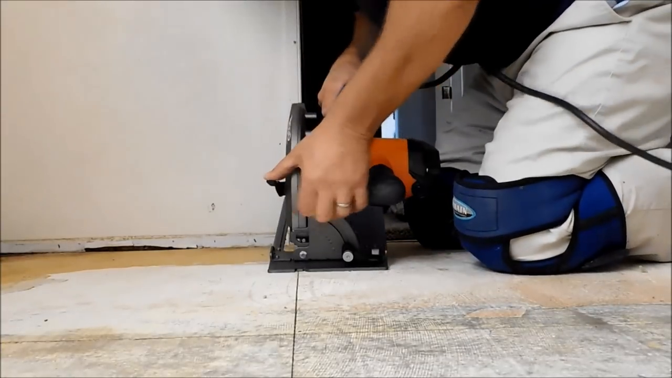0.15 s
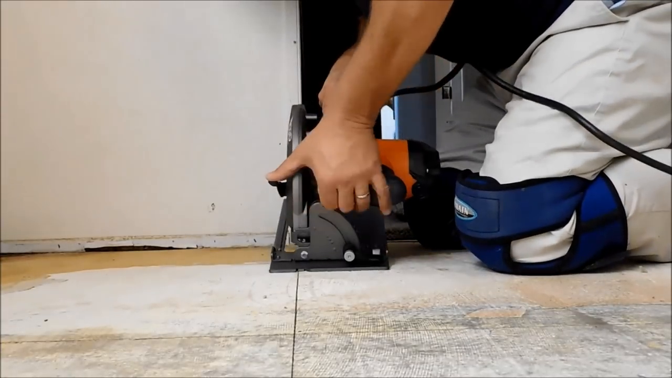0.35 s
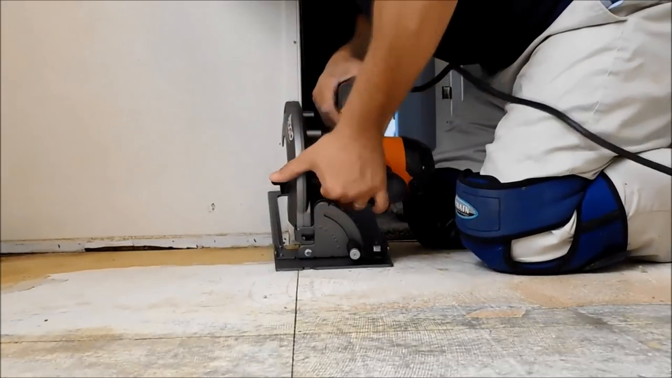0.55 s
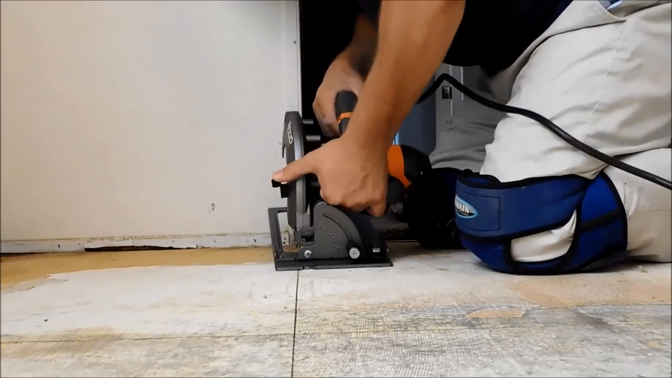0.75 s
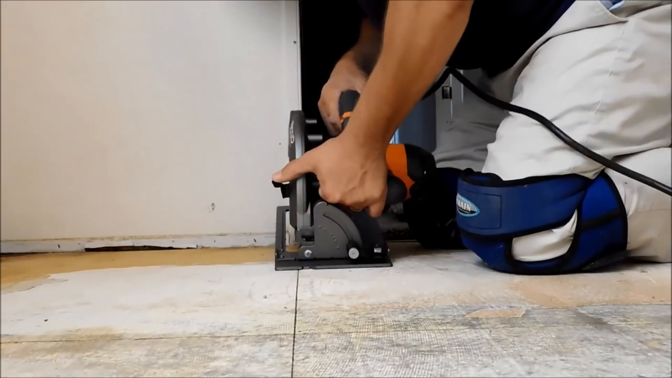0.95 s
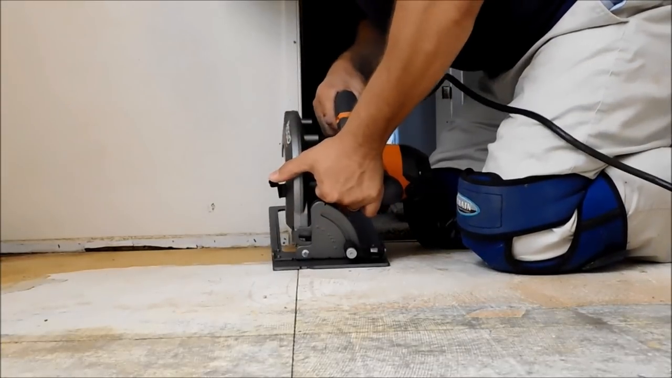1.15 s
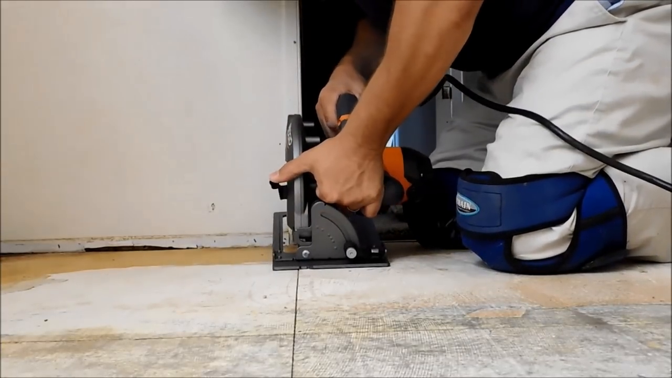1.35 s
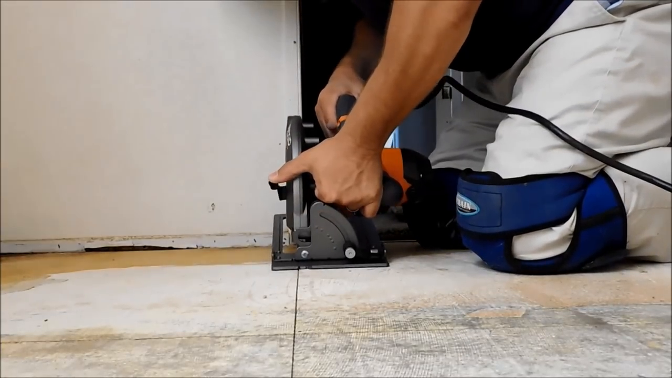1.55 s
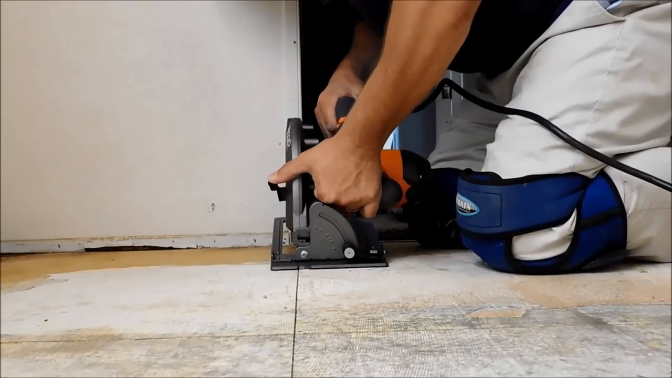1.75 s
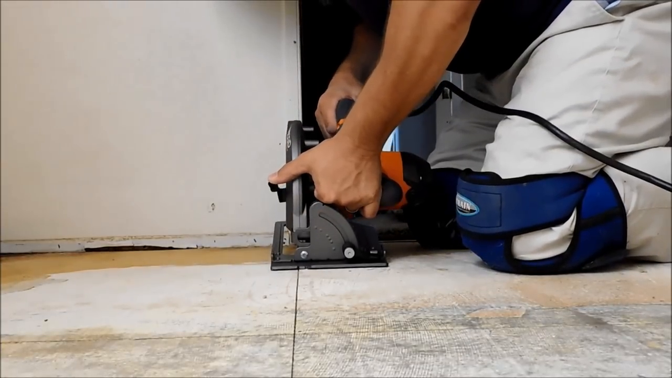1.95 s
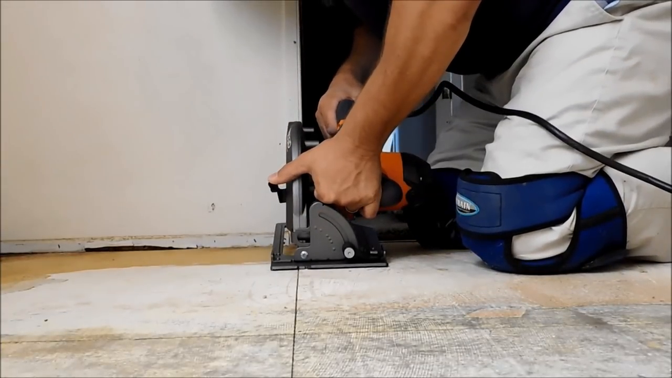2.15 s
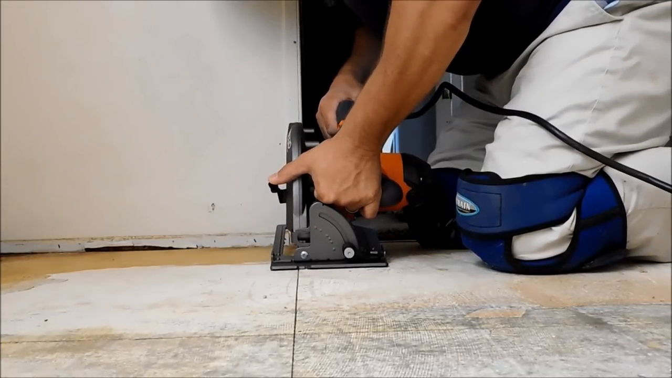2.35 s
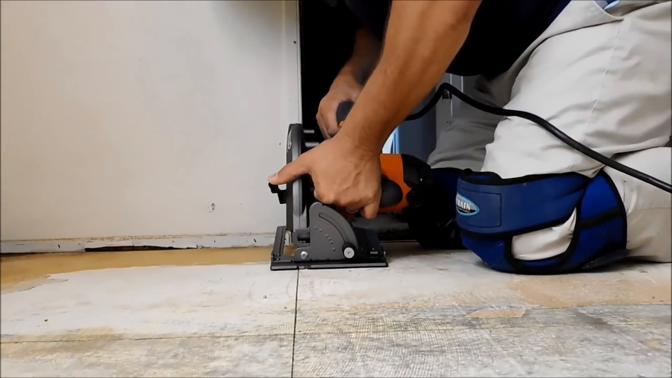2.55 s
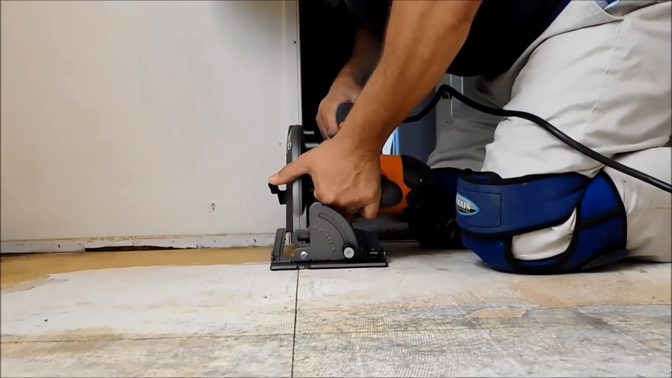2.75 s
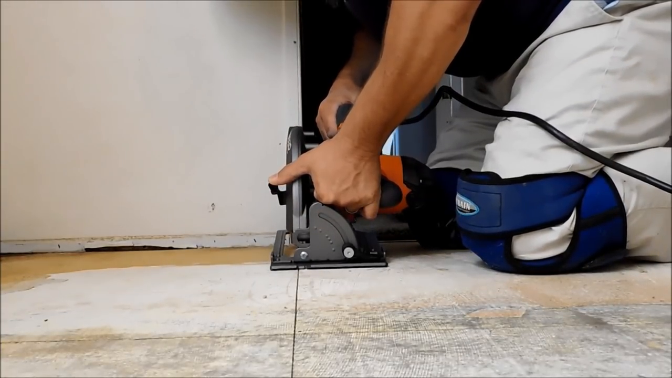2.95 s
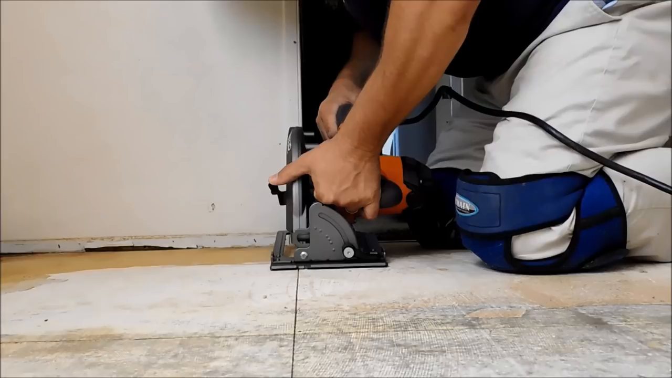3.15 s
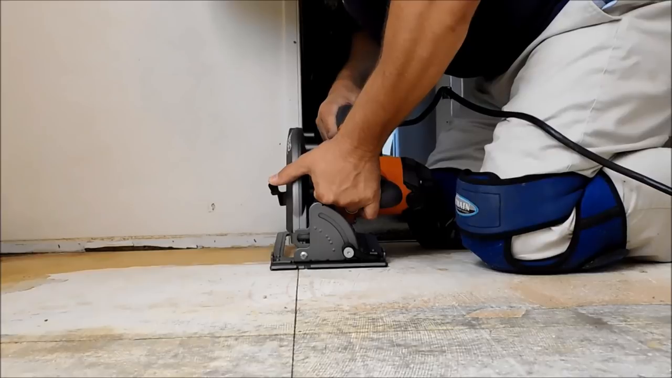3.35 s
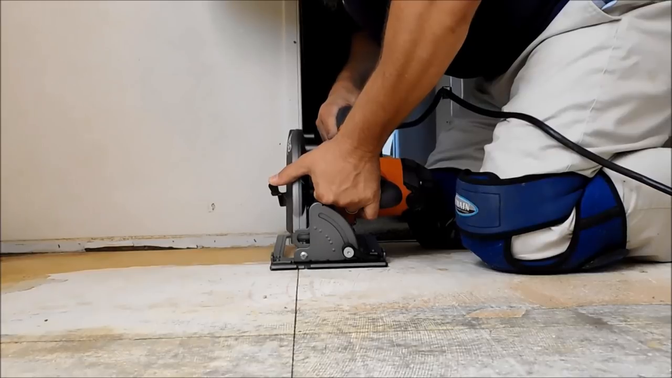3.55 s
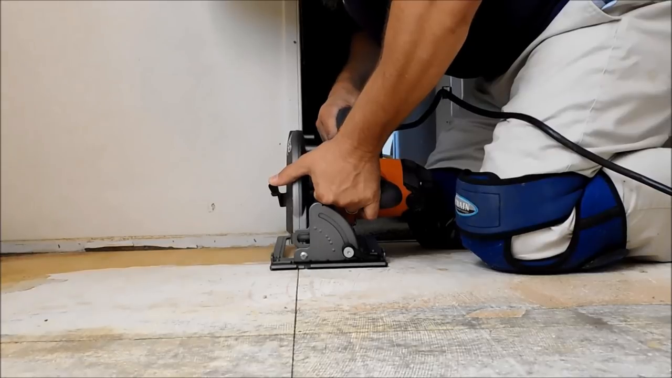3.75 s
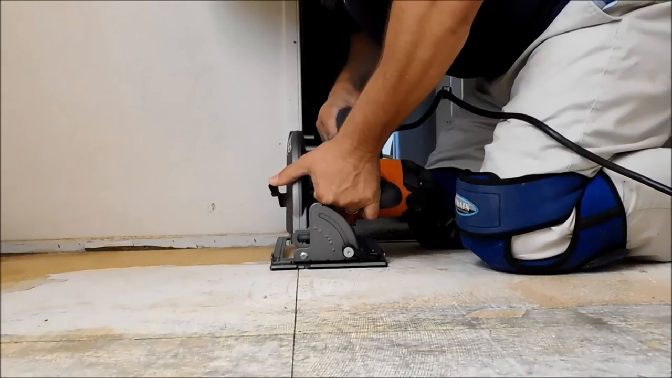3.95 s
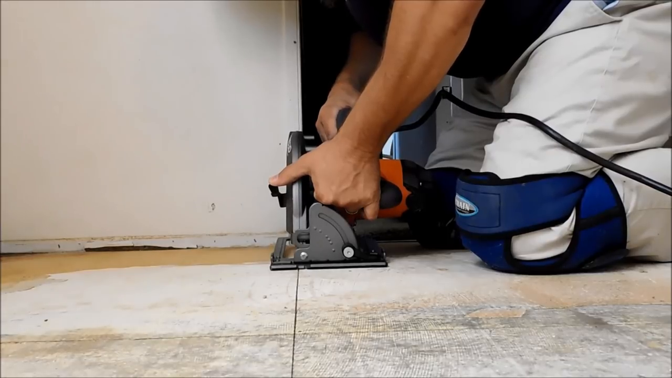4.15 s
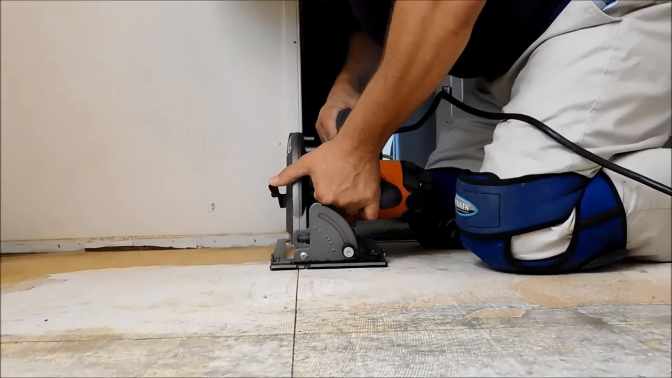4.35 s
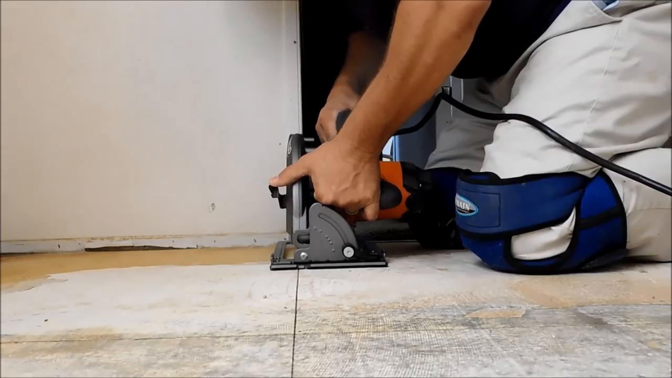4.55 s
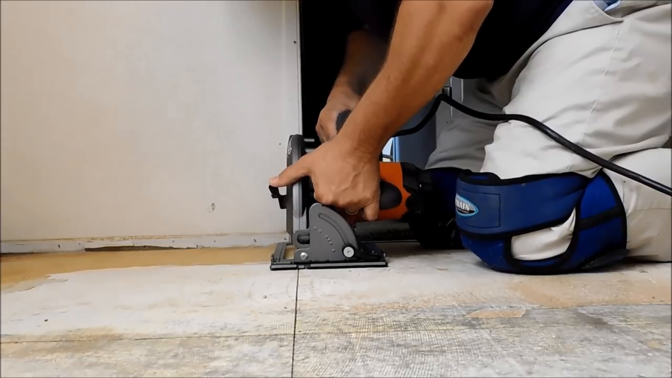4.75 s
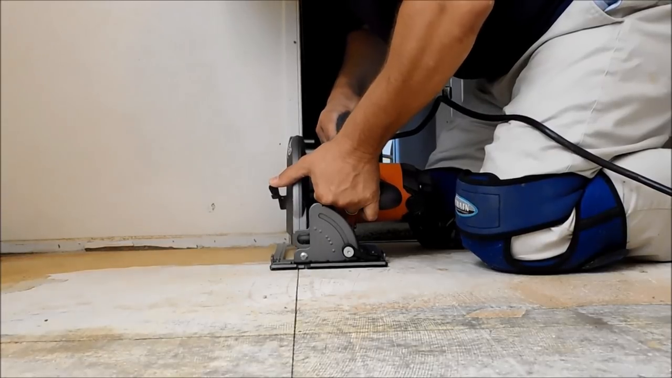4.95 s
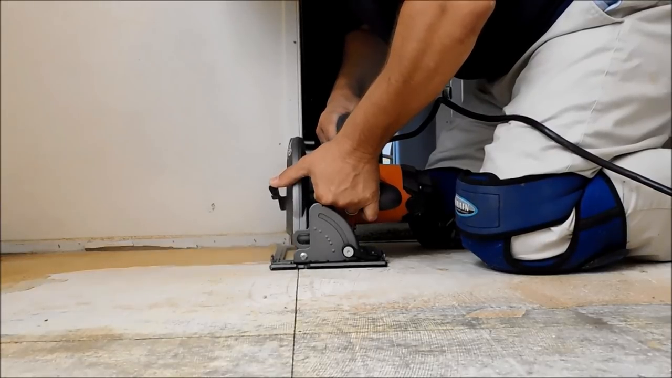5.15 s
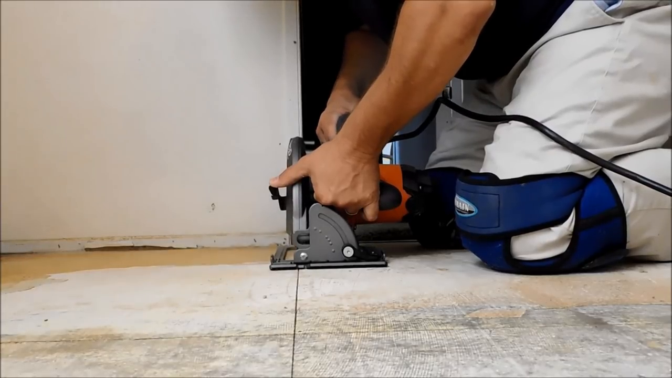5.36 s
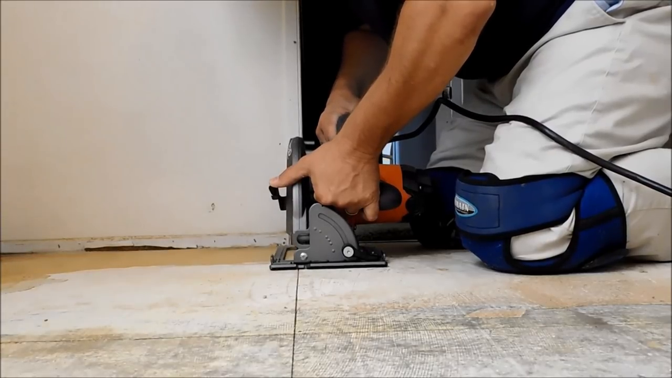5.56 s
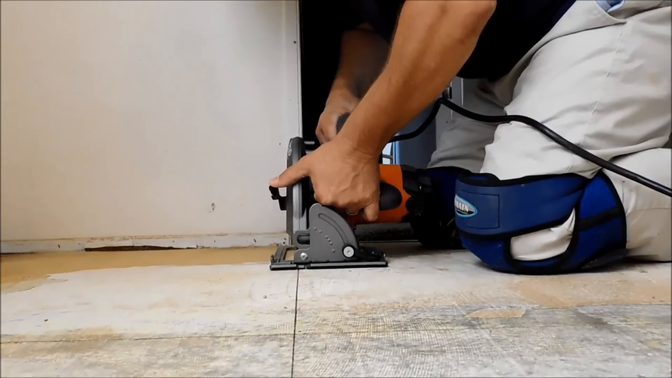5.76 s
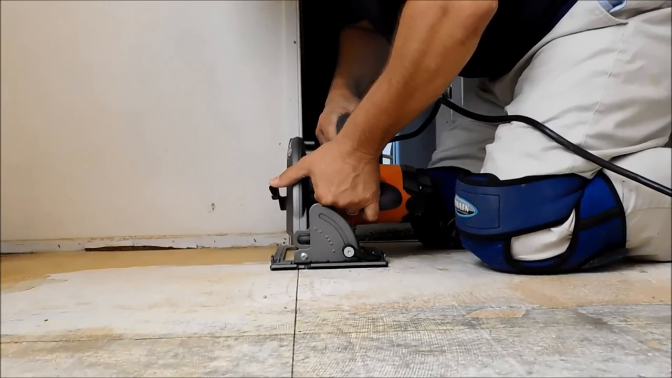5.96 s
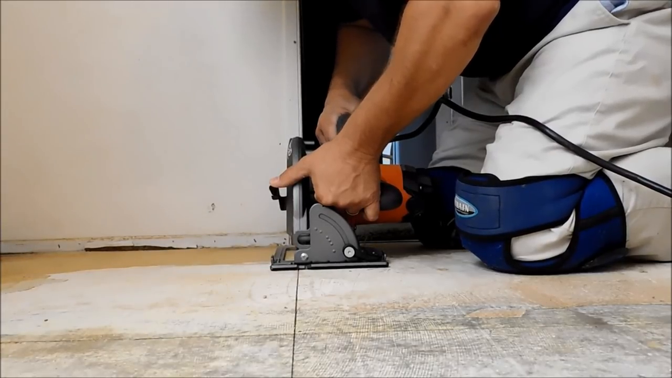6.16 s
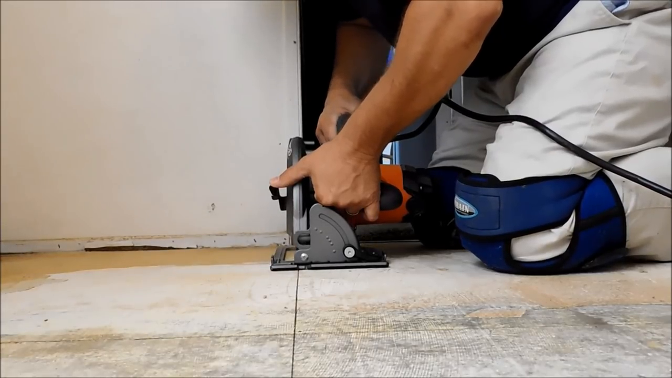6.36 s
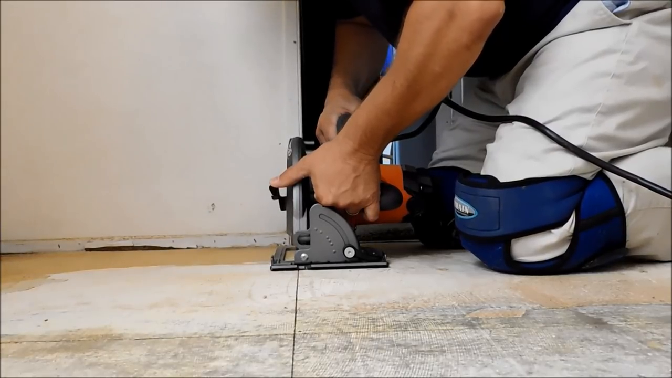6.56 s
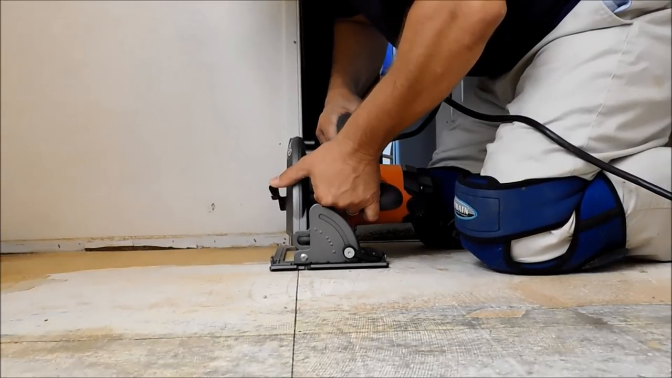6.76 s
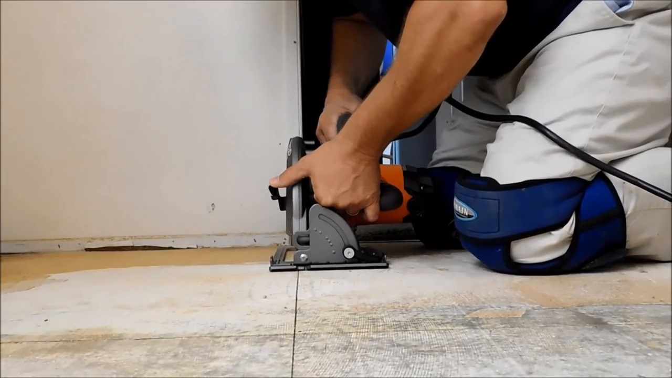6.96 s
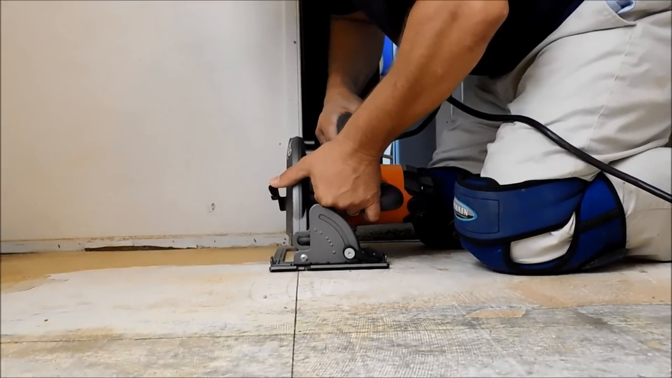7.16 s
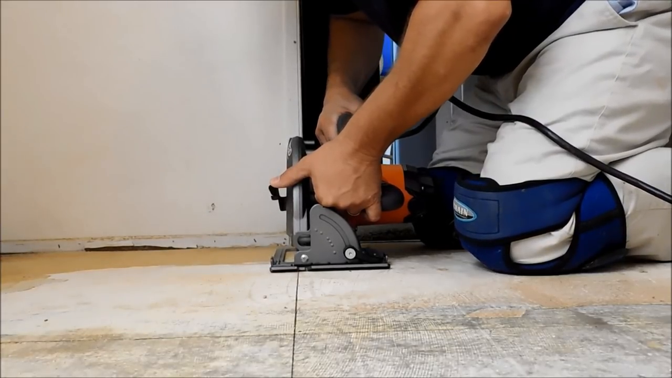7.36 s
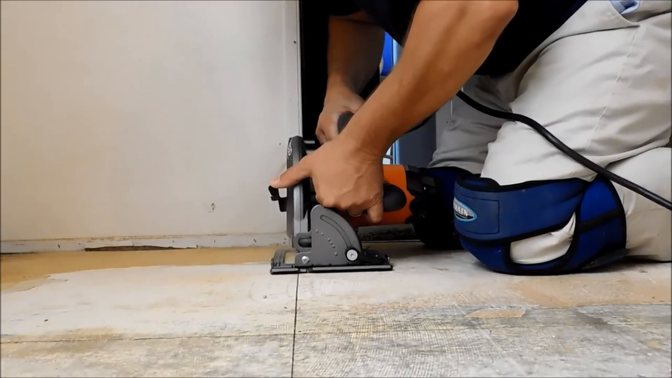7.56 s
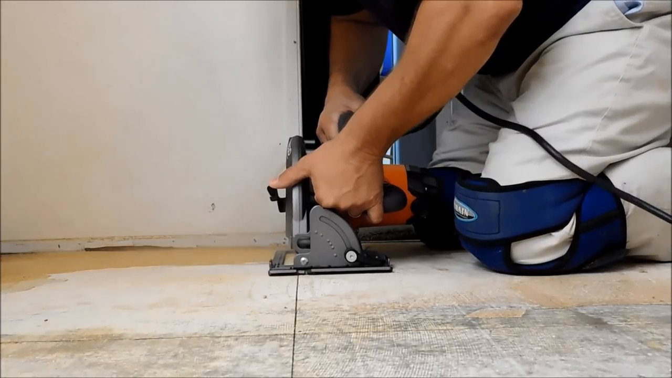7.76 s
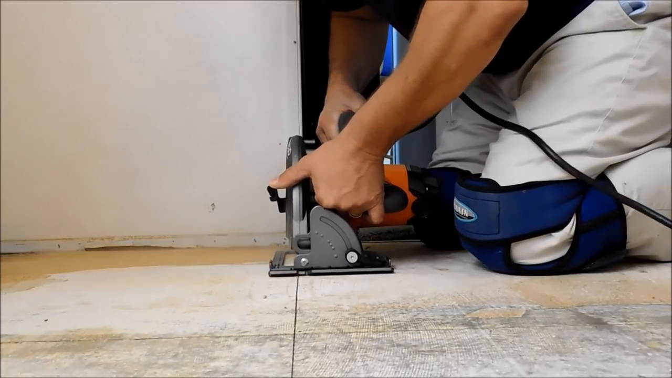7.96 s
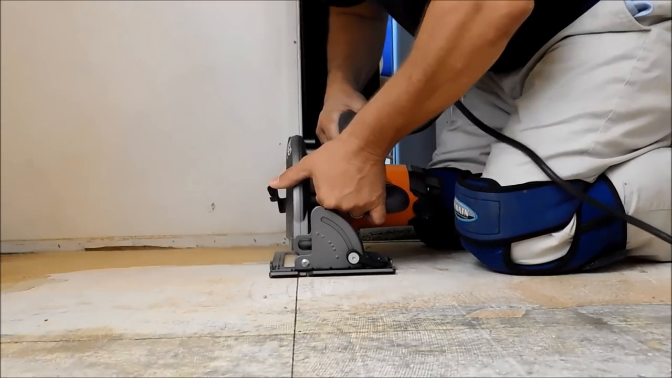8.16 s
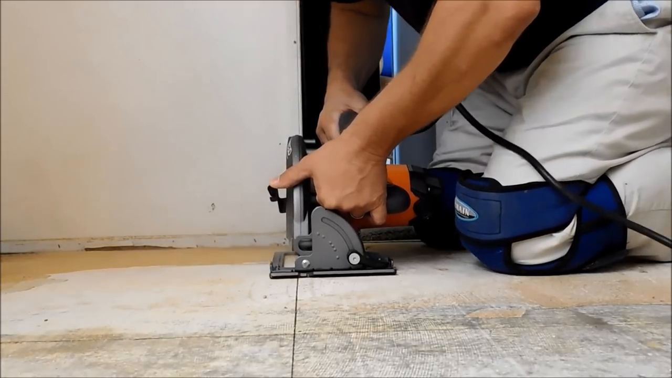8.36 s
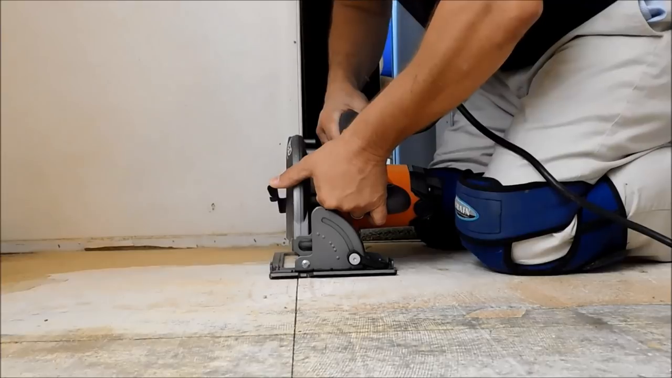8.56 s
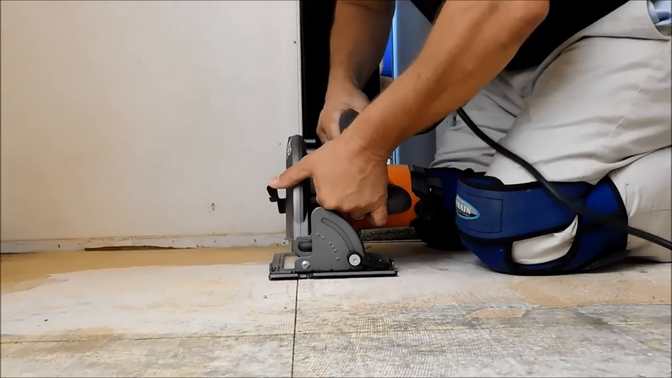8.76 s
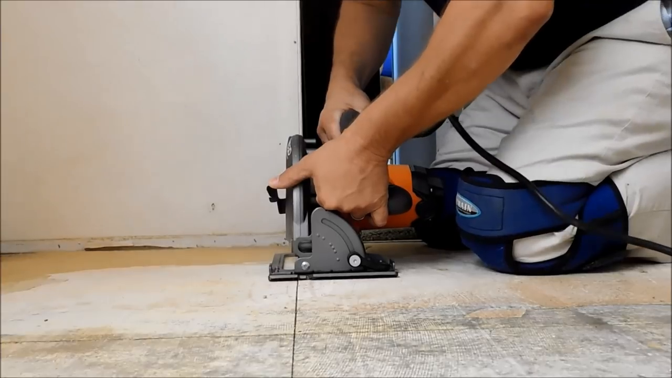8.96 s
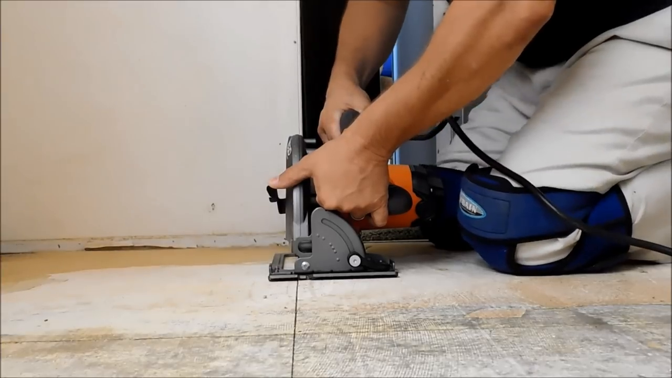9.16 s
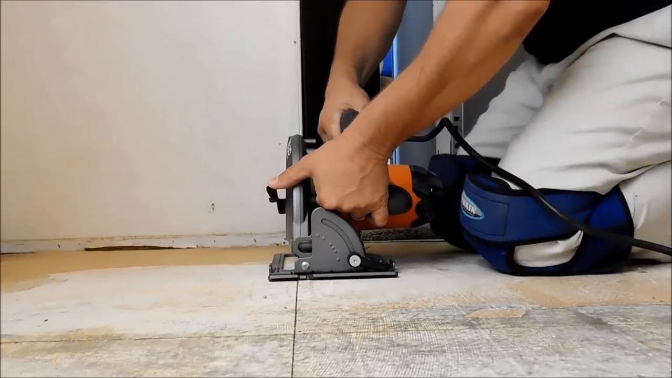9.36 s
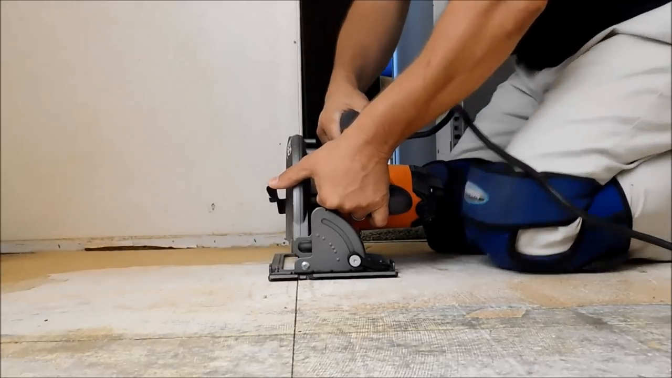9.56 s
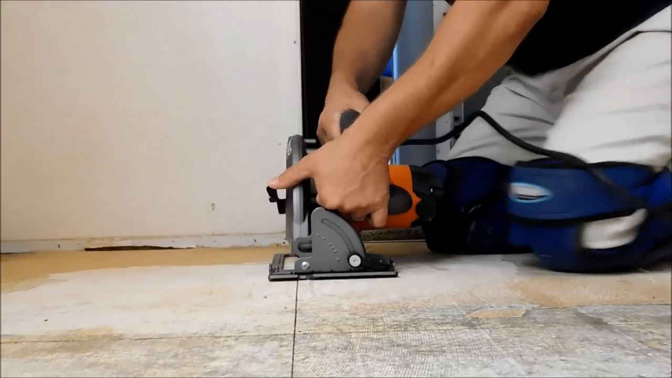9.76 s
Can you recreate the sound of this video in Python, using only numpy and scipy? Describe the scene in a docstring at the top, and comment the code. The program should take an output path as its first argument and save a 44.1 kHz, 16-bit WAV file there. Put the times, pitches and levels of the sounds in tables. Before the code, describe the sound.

A guard clacks, a hand rubs the housing, then a circular saw rattles up to speed and cuts wood in a steady roar.

```python
"""Hand-held circular saw indoors

The guard of a saw on a wooden floor clacks, a hand rubs its housing, the motor runs up and the blade cuts.
Armature, gears and teeth sing as sines locked to the turning speed, which sags under load.
Noise bands make a low rumble and the roar of cutting and cooling air; noise also drives blade and base plate.
Knocks ring the housing and excite the room, over a faint room tone."""
import sys
import numpy as np
from scipy import signal
from scipy.fft import rfft, irfft, next_fast_len
from scipy.io import wavfile
from scipy.ndimage import uniform_filter1d

SR = 44100
rng = np.random.default_rng(int(sys.argv[2]) if len(sys.argv) > 2 else 0)


def dump_mix(stems):
    """Bounce the given channels to the path in sys.argv[1] as a 16-bit WAV at rate SR."""
    frames = np.atleast_2d(stems).T  # one column per channel
    limited = np.clip(frames, -1, 1)  # hard clip at full scale
    pcm = np.round(limited * 32767).astype(np.int16)
    wavfile.write(sys.argv[1], SR, pcm)


N = 433062

# Tones of armature, gears and teeth; a 9-tooth pinion drives a 42-tooth gear, and row 3 is the gear mesh:
# multiple of the armature speed, left_lead_rad, left_minus_right_db
TONE_ORDERS = [(3, .5, -.5), (5, .8, -1.4), (24 * 9 / 42, .2, -1), (9, .8, -3.9), (15, -1.5, -2.6)]
MESH_ROW = 3
TRIGGER_S = 1.41
FREE_HZ = 411  # armature turns a second without load


def run_up_deficit():
    """Exponential approach: how far (Hz) the run-up still is below the free speed."""
    return 350 * np.exp(-since(TRIGGER_S) / .33)


def speed():
    """Motor dynamics: armature turns a second near the free speed exponentially and sag under load."""
    # Slowing by the load of the cut: time_s, sag_hz
    load_sag = [(3.3, 0), (3.78, 8), (4.3, 6.5), (4.55, 13), (4.92, 14.5), (5.11, 21), (5.3, 22.5),
                (5.68, 12), (5.95, 7), (6.4, 6), (6.75, 3.5), (7.05, 6), (7.4, 5.5), (7.77, 24.5),
                (7.96, 25.5), (8.34, 23.5), (8.72, 16), (8.91, 19), (9.29, 10), (9.82, 1)]
    # the armature briefly runs ahead while the gears take up
    surge_hz = 17 * np.exp(-((np.arange(N) / SR - 1.59) / .07) ** 2)
    return FREE_HZ - run_up_deficit() + surge_hz - curves(load_sag)[0]


def running():
    """Switching gate: 0 before the trigger, rising linearly to 1 in 8.9 ms."""
    return np.clip(since(TRIGGER_S) / 0.0089, 0, 1)


def tone_db(k, armature_hz):
    """Resonant amplification: a tone is loudest where it meets a resonance of the tool."""
    # Resonance that each tone meets: centre_hz
    sweet_hz = [1212, 2040, 2080, 3478, 6075]
    # Response of each tone: level_away_db, rise_on_resonance_db, half_width_hz
    singing = [(-58, 13, 12), (-52, 9, 35), (-51, 9, 30), (-47, 8, 40), (-58, 13, 60)]
    # Momentary swells of one tone: middle_s, half_length_s, tone index, rise_db
    swells = [(2.2, .5, 0, 8), (2.1, .15, 4, 14), (2.54, .25, 2, 5), (2.65, .55, 1, 9), (3.45, .25, 1, 7),
              (4.27, .1, 4, 9), (4.45, .3, 3, 5), (4.75, .2, 1, 8), (5.58, .3, 0, 9), (5.58, .3, 1, 8),
              (6.2, .4, 2, 4), (7.2, .4, 2, 5), (7.15, .3, 0, 5), (7.28, .1, 4, 10), (7.95, .25, 3, 2),
              (8.0, .12, 2, 10), (8.62, .2, 0, 12), (8.62, .2, 2, 7), (8.85, .2, 3, 5), (5.3, .4, 3, 1.5),
              (9.62, .2, 2, 6), (3.1, .5, 3, 5)]
    away_db, rise_db, half_hz = singing[k]
    detuning = (TONE_ORDERS[k][0] * armature_hz - sweet_hz[k]) / half_hz
    near = 1 / (1 + detuning ** 2)
    swell_db = sum(up_db * bump(s, half) for s, half, tone, up_db in swells if tone == k)
    return away_db + rise_db * near + swell_db


def tones():
    """Order-locked radiation: sines follow the armature, their phase and strength shaken by the cut."""
    # Weak companion tones: tone index, frequency ratio to that tone, relative_db
    companions = [(2, 2, -10), (3, 2, -18), (3, 40 / 42, -7), (4, 2, -10)]
    armature_hz = speed()
    turns = 2 * np.pi * np.cumsum(armature_hz) / SR  # angle in rad
    level_db = [tone_db(k, armature_hz) for k in range(len(TONE_ORDERS))]
    main_tones = [(k, 1, 0) for k in range(len(TONE_ORDERS))]
    out = np.zeros((2, N))
    for k, ratio, relative_db in main_tones + companions:
        order, lead, pan_db = TONE_ORDERS[k]
        stereo_phase = np.array([[lead / 2], [-lead / 2]])
        pair = np.sin(order * ratio * turns + 0.55 * wobble(45) + stereo_phase)
        shaken_db = level_db[k] + relative_db + 2.8 * wobble(25) + 2.8 * wobble(9)
        out += np.sqrt(2) * amp(shaken_db) * sides(pan_db)[:, None] * pair
    emerge = np.clip(since(1.7) / .2, 0, 1)  # out of the run-up
    return emerge * out


def run_up():
    """Phase modulation: chattering teeth smear the rising mesh harmonics; the field iron hums."""
    # What the gear case passes of the mesh tone: frequency_hz, level_db
    case = [(600, -52), (1150, -30), (1600, -27), (2300, -29), (2600, -37), (2850, -40), (3050, -44),
            (3400, -42), (3950, -34), (5000, -40), (6300, -50), (6600, -39), (7000, -38), (7500, -50),
            (8700, -48), (9500, -38), (10200, -52)]
    # Mesh tone and its 2nd and 3rd harmonics: relative_db
    mesh_db = [0, -1, -1]
    # Hum of the starting current in the field iron: frequency_hz, initial_db, t60_s
    inrush = [(119, -45, 2.5), (476, -35.5, 1)]
    settle_s, settle_db_per_s = 2.3, 80  # the gears settle and the chatter dies
    rich_hz, rich_db_per_hz = 190, .3  # below this armature speed the harmonics are still weak
    armature_hz = speed()
    mesh_hz = TONE_ORDERS[MESH_ROW][0] * armature_hz
    mesh = 2 * np.pi * np.cumsum(mesh_hz) / SR
    out = np.zeros((2, N))
    for k, relative_db in enumerate(mesh_db):
        db = relative_db + along(case, (k + 1) * mesh_hz) - settle_db_per_s * since(settle_s)
        db = db - (k > 0) * rich_db_per_hz * np.maximum(rich_hz - armature_hz, 0)
        smooth = uniform_filter1d(rng.standard_normal((3, N)), size=100)
        chatter = unit(uniform_filter1d(smooth, size=100))
        shake = (1.05 + .3 * k) * (chatter[0] + .5 * chatter[1:])  # phase, partly common to both sides
        level = amp(db + 1.7 * wobble(40.2) + 3.6 * chatter[1:])
        out += np.sqrt(2) * level * np.sin((k + 1) * mesh + shake)
    t = since(TRIGGER_S)
    hum = sum(amp(db - 60 * t / t60) * np.sin(2 * np.pi * hz * t) for hz, db, t60 in inrush)
    return out + hum


def roar_db():
    """Broadband source strength: levels of rumble, body, hiss and top hiss through run-up and cut."""
    # Bass thins out and treble gains: time_s, rumble_loss_db
    thinning = [(1.54, -2), (1.6, 0), (2.93, 0.5), (3.14, 6), (3.28, 5), (3.44, 2), (3.65, 4.5), (4.87, 7),
                (5.08, 10), (5.58, 3), (6.68, 3), (6.91, 6), (7.26, 3), (7.33, 6), (7.66, 6), (9.4, 7),
                (9.6, 3.5)]
    # Rumble, body, hiss, top hiss: free_speed_db, loss in dB per Hz of run-up deficit,
    # change in dB per dB of thinning, short_at_trigger_db
    layers = [(-39, 0, -1, 12), (-25.1, 0, -.6, 8), (-24.8, .045, 0, 2), (-33.6, .066, .6, 0)]
    deficit_hz = run_up_deficit()
    catch = np.exp(-since(TRIGGER_S) / .05)  # the layers fill in
    thin_db = curves(thinning)[0]
    return [db - slope * deficit_hz + tilt * thin_db - short_db * catch
            for db, slope, tilt, short_db in layers]


def roar():
    """Broadband noise: a low rumble under the body, hiss and top hiss of cutting and cooling air."""
    # Noise spectra: frequency_hz, relative density in dB per Hz
    rumble = [(8.8, -37), (15, -5), (476, -7), (600, -2.5), (780, -9), (1320, -120)]
    body = [(210, -23), (350, -12.5), (916, -3.5), (1360, -1), (1580, -0.5), (2040, -0.5), (2580, -1),
            (3600, -4), (4500, -14), (5850, -17), (9900, -120)]
    hiss = [(2060, -17.5), (3500, -5.5), (3960, -7), (4820, -9.5), (10000, -13), (13000, -18),
            (22000, -120)]
    top = [(5290, -5), (9000, -8), (14700, -2.5), (15500, -3.5), (16000, -21.5)]
    # Likeness of left and right: frequency_hz, correlation
    alike = [(60, -0.14), (120, -0.023), (240, 0.038), (480, 0.042), (950, 0.29), (1890, 0.26),
             (3770, -0.18), (7520, 0.15), (15000, 0.18)]
    # Balance of the sides: frequency_hz, left_minus_right_db
    lean = [(60, -1.0), (110, -2), (200, -1.0), (380, -1.0), (700, -0.5), (1290, -2), (2380, -1.5),
            (4400, -1), (8120, 0), (15000, 0.5)]
    feed_db = 0.5 * wobble(8) + 0.21 * wobble(35)  # the feed pressure shakes all bands together
    layers = zip(roar_db(), (rumble, body, hiss, top))
    noise = sum(amp(db + feed_db) * rush(colour, alike, patchy_db=1.3) for db, colour in layers)
    return filtered(noise, lambda hz: sides(along(lean, hz)))


def plate():
    """Forced resonance: the cut drives blade and base plate, harder as the blade gains speed."""
    # Blade and base plate resonances: centre_hz
    plate_hz = [660, 1190, 1320, 1380, 1490, 1670, 1755, 2190, 2340, 2450, 2920, 3070, 3315, 3480, 4040,
                4457, 5020]
    # The same resonances: width_hz of each of two equal stages, relative_db, left_minus_right_db
    modes = [(50, -26, -1), (25, -23, -1), (30, -25, -2), (35, -21, -1), (35, -23, 0), (30, -24, -4),
             (30, -22, -3), (35, -27, -1), (90, -30, -1), (30, -25, 0), (35, -29, -2), (60, -24, -1),
             (50, -22, -5), (40, -21, -7), (35, -28, -1), (25, -30, 4), (30, -28, -1)]
    # One resonance flares in the rattle of the start, as the mesh tone sweeps past, or during the cut:
    # middle_s, half_length_s, centre_hz, rise_db
    flares = [(1.52, .06, 1190, 26), (1.49, .11, 2340, 30), (1.68, .08, 2340, 15), (1.46, .08, 1670, 25),
              (1.47, .08, 1490, 26), (9.1, .6, 3480, 4), (3.1, .2, 1755, 5), (4.9, .25, 2190, 6),
              (4.9, .2, 2450, 7), (5.82, .13, 4457, 15), (7.3, .9, 1755, 5), (8.1, .4, 3315, 7),
              (7.97, .3, 3480, 4), (5.8, 1.2, 3480, 4), (6.6, 1, 1380, 3), (4.3, .9, 1380, 3),
              (8.7, .5, 2190, 5), (9.15, .3, 2920, 6), (9.4, .8, 1320, 6), (9.4, .3, 2450, 5)]
    all_db = 1.5  # all resonances together, over the body roar
    shake = rng.standard_normal((2, N))
    shake[1] = shake[0] + shake[1]  # the sides share part of the drive
    rings = filtered(shake, lambda f: np.array([[resonance(f, hz, row[0]) ** 2]
                                                for hz, row in zip(plate_hz, modes)]))
    out = np.zeros((2, N))
    for hz, (_, db, pan_db), ring in zip(plate_hz, modes, rings):
        flare_db = sum(rise_db * bump(s, half) for s, half, at_hz, rise_db in flares if at_hz == hz)
        level = amp(db + flare_db + 2.2 * wobble(2.2) + 2.5 * wobble(12))
        out += level * sides(pan_db)[:, None] * [unit(side) for side in ring]
    return amp(roar_db()[1] + all_db) * speed() / FREE_HZ * out


def knocks():
    """Impact excitation: a short push and a dying rattle ring the housing, with a tick on top."""
    # Guard, trigger and gear backlash contacts: start_s, relative_db, treble_relative_db, rattle_relative_db
    contacts = [(0.017, -25, -37, -2), (0.034, -10.5, -22, -8.5), (1.408, -28, -14, -8),
                (1.418, -10.5, -32, -12.5), (1.445, -18, -29, -14), (1.491, -14, -29, -11),
                (1.523, -15, -27, -11)]
    # What the housing and guard ring with: centre_hz, width_hz, relative_db
    guard = [(700, 220, -10.5), (1090, 116, -1), (1426, 150, 1.5), (1820, 160, -4.5), (2293, 62, -1.5),
             (2670, 49, -7.5), (2950, 38, -2), (3290, 62, -11.5), (4500, 2600, -31), (6030, 1800, -24)]
    blows, ticks = np.zeros(N + SR), np.zeros(N + SR)
    t = np.arange(SR // 3) / SR
    for s, db, treble_db, rattle_db in contacts:
        here = slice(round(s * SR), round(s * SR) + len(t))
        blunt = uniform_filter1d(rng.standard_normal(len(t)), size=11)
        push = 5 * amp(-60 * t / 0.011) * blunt
        rattle_level = amp(rattle_db - 60 * t / 0.38) * (1 - np.exp(-t / 0.015))
        rattle = rattle_level * rng.standard_normal(len(t))
        blows[here] += amp(db + 7.5) * (push + rattle)
        ticks[here] += amp(db + treble_db + 1 - 60 * t / 0.06) * rng.standard_normal(len(t))

    def housing(f):
        """Modal superposition: resonances of alternating sign; the small housing radiates no bass."""
        ring = sum((-1) ** k * amp(db) * resonance(f, hz, w) for k, (hz, w, db) in enumerate(guard))
        return ring * (1j * f / (300 + 1j * f)) ** 2

    return filtered(blows[:N], housing) + filtered(ticks[:N], lambda f: resonance(f, 5100, 7300) ** 2)


def grip():
    """Friction excitation: the hand's rubbing noise rings the housing until the motor starts."""
    # Hand shifting on the tool: time_s, rub_db
    shifts = [(.2, -63), (.3, -54), (.4, -54.5), (.47, -51), (.52, -55), (.56, -54), (.6, -53), (.7, -64),
              (1, -73), (1.4, -69)]
    # Resonances of the rubbed housing: centre_hz, width_hz, relative_db
    rub_modes = [(865, 30, 4), (1280, 200, -9), (2020, 100, -1), (2490, 55, 2), (3170, 50, -1),
                 (9000, 9000, -33)]
    noise = rng.standard_normal((2, N))
    rub = filtered(noise, lambda f: sum(amp(db) * resonance(f, hz, w) for hz, w, db in rub_modes))
    begun = np.arange(N) / SR > shifts[0][0]
    return amp(curves(shifts)[0] + 1.5 * wobble(29.6)) * unit(rub) * begun * (1 - running())


def room(x):
    """Reverberation: each frequency of the room's answer dies at its own speed."""
    # Decay of the room: frequency_hz, t60_s
    decay = [(300, .3), (1500, 0.3), (5000, 0.61), (12000, .2)]
    hz, t, z = signal.stft(rng.standard_normal((2, SR // 2)), SR, nperseg=256)
    tail = signal.istft(z * amp(-60 * t / along(decay, hz)[:, None]), SR, nperseg=256)[1]
    delayed = np.pad(x, (300, 0))[None]  # samples
    return signal.fftconvolve(delayed, tail / np.linalg.norm(tail[0]), axes=1)[:, :N]


def room_tone():
    """Stationary background: faint coloured noise throughout."""
    # Spectrum of the room tone: frequency_hz, relative density in dB per Hz
    quiet = [(12, -50), (20, -20), (65, -13), (168, -16.5), (388, -7.5), (485, -3), (738, -5.5),
             (1330, -1.5), (1960, -6), (2530, -6), (4180, -14), (14700, -25), (16000, -33)]
    # Likeness of left and right: frequency_hz, correlation
    quiet_alike = [(60, 0.74), (380, 0.75), (2380, 0.25), (15000, -0.2)]
    return amp(-55) * rush(quiet, quiet_alike, patchy_db=1.4) * sides(-2.3)[:, None]


def rush(spectrum, alike, patchy_db):
    """Partially coherent noise: stereo of rms 1, with time-frequency patches of random gain."""
    z = signal.stft(rng.standard_normal((2, N)), nperseg=512)[2]
    field = uniform_filter1d(rng.standard_normal(z.shape[1:]), size=6, axis=0)
    field = uniform_filter1d(field, size=10, axis=1)
    pair = signal.istft(z * amp(patchy_db * unit(field)), nperseg=512)[1][:, :N]

    def colour(hz):
        """Mid-side decomposition: the angle between mid and side sets the correlation."""
        turn = np.arccos(np.clip(along(alike, hz), -1, 1)) / 2
        return amp(along(spectrum, hz)) * [np.cos(turn), np.sin(turn)]

    mid, side = filtered(pair, colour)
    return unit(np.array([mid + side, mid - side]))


def resonance(f, hz, width_hz):
    """Damped oscillator: complex band-pass response, 1 at its centre."""
    return 1j * f * width_hz / (hz * hz - f * f + 1j * f * width_hz)


def filtered(x, response):
    """Linear filtering: the spectrum of x times a complex response of frequency."""
    m = next_fast_len(N + SR // 2)
    return irfft(rfft(x, m) * response(np.fft.rfftfreq(m, 1 / SR)), m)[..., :N]


def wobble(rate):
    """Random modulation: straight lines between normal random knots, rate knots a second."""
    knots = rng.standard_normal(600)
    return np.interp(np.arange(N) * rate / SR, np.arange(len(knots)), knots)


def bump(s, half):
    """Trapezoidal envelope: a flat-topped swell from 0 to 1 around s."""
    return np.clip(2 - 2 * abs(np.arange(N) / SR - s) / half, 0, 1)


def since(s):
    """Elapsed time: seconds after s, 0 before."""
    return np.maximum(np.arange(N) / SR - s, 0)


def curves(rows):
    """Linear interpolation: one value per sample for each column after the time."""
    s, *cols = np.transpose(rows)
    return [np.interp(np.arange(N) / SR, s, c) for c in cols]


def along(points, hz):
    """Logarithmic interpolation: (Hz, value) points on a log frequency axis."""
    f, v = np.transpose(points)
    return np.interp(np.log(hz + 1), np.log(f + 1), v)


def sides(db):
    """Level panning: gains of left and right for a left-minus-right difference."""
    return amp([db / 2, -db / 2])


def amp(db):
    """Decibel law: amplitude ratio of a level."""
    return 10 ** (np.asarray(db) / 20)


def unit(x):
    """Power normalisation: x scaled to rms 1."""
    return x / np.sqrt(np.mean(x ** 2) + 1e-20)


def scene():
    """Superposition: the saw, its knocks with their reverberation, the hand and the room tone."""
    hits = knocks()
    # the starting saw sounds from further right, then evens out
    pan = sides(-2.2 * np.exp(-since(TRIGGER_S) / .6))
    saw = running() * pan * (tones() + run_up() + roar() + plate())
    return saw + hits * sides(-5.5)[:, None] + amp(-2) * room(hits) + grip() + room_tone()


def record(dry):
    """Soft saturation and band limiting: the highest peaks are rounded, the extreme treble is cut."""
    soft = dry / (1 + np.abs(dry / .4) ** 4) ** .25
    return filtered(soft, lambda hz: hz < 15750)


dry = scene()
out = record(dry)
dump_mix(out)
```